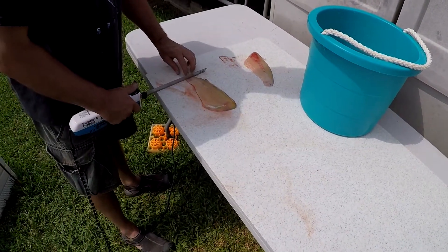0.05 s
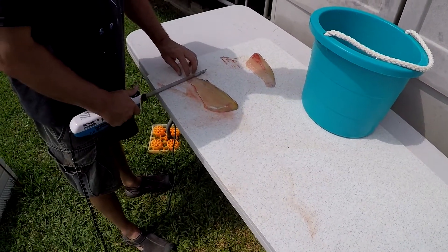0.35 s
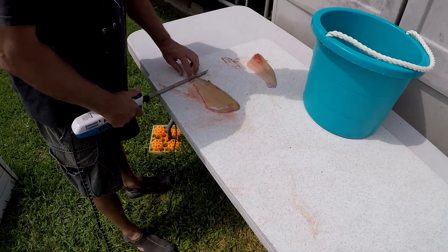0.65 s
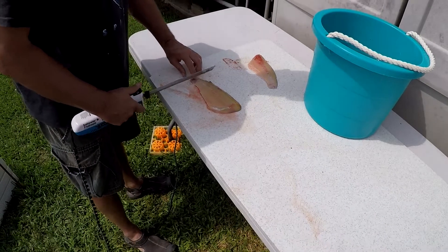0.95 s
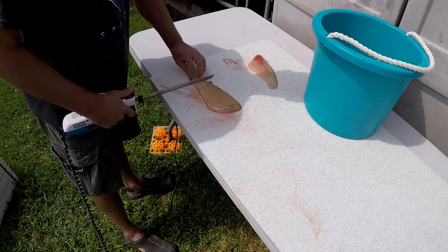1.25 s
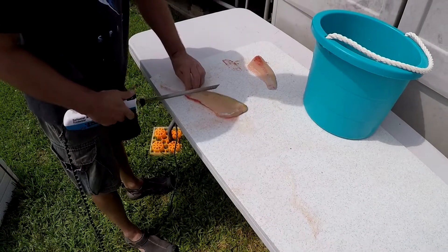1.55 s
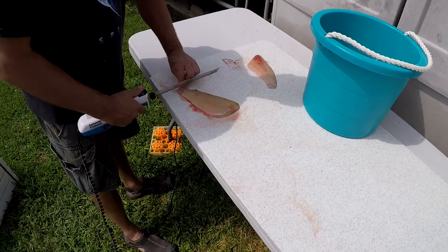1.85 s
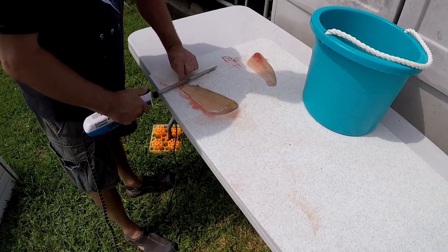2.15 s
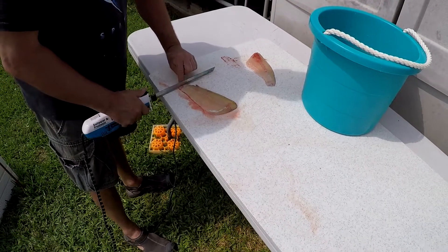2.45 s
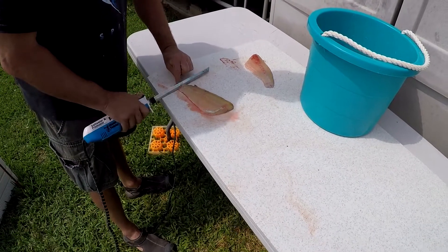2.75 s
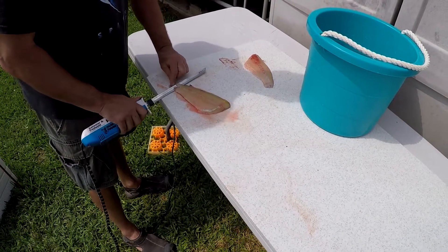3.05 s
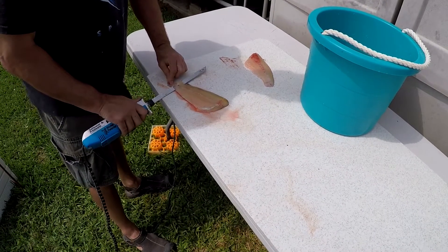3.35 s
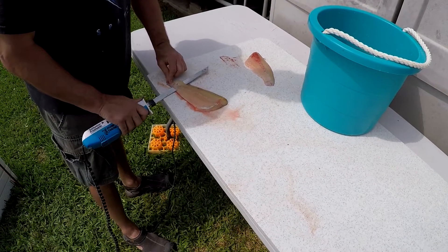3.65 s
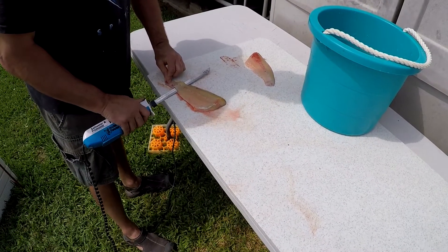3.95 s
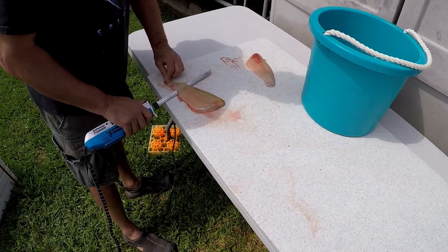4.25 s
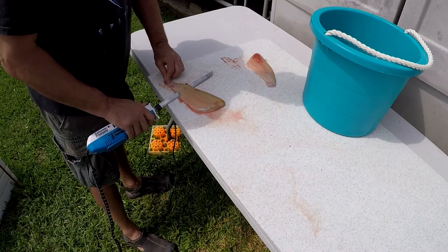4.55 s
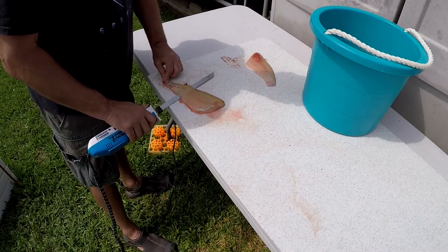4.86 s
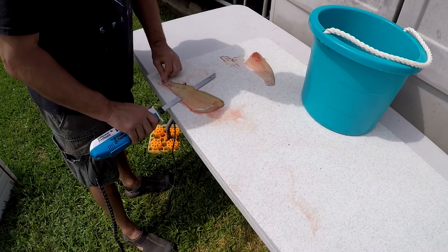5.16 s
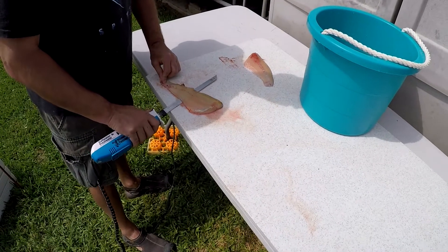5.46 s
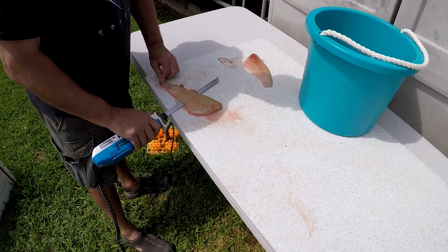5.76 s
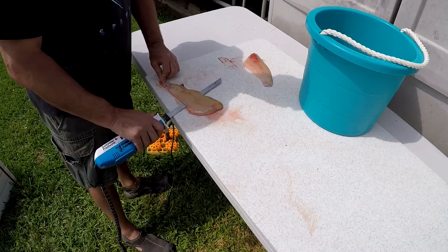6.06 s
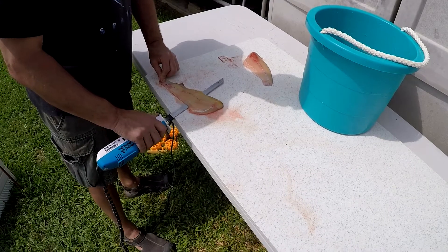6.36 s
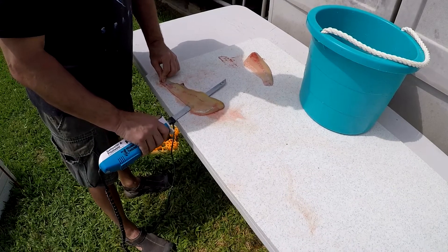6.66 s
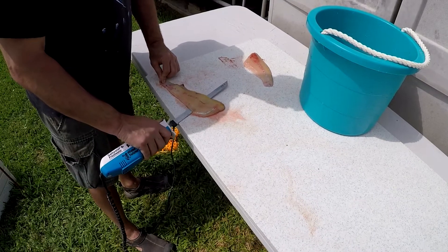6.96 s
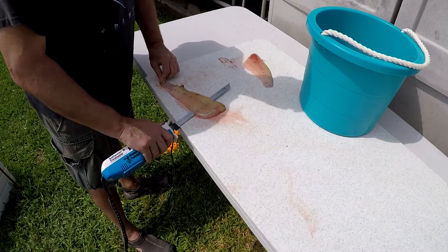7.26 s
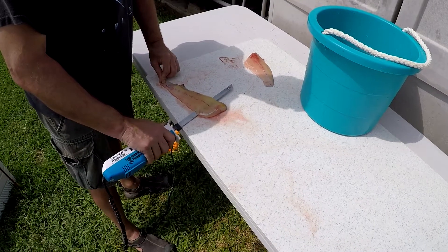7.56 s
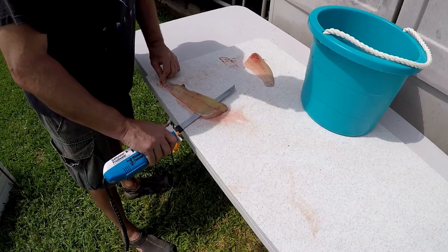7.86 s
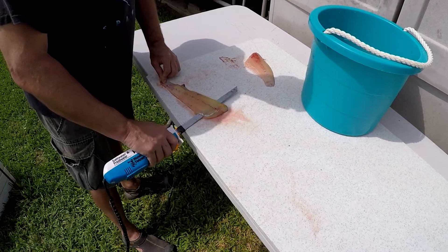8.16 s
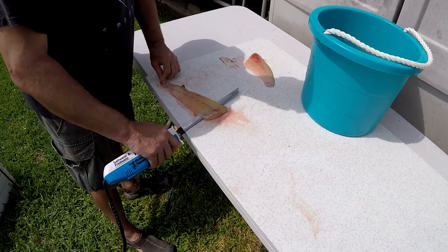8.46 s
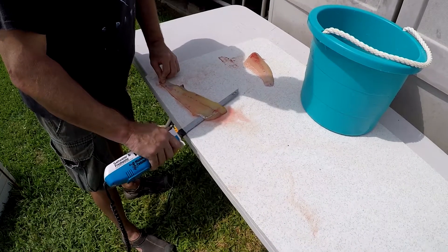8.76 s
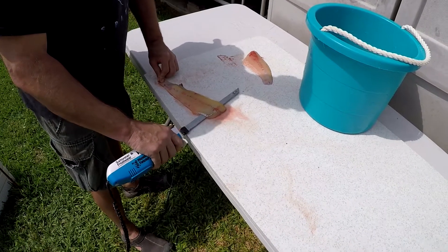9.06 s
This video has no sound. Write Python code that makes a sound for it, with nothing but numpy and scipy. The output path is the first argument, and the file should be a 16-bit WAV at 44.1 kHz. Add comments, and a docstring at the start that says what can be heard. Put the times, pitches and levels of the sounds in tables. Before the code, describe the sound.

An electric knife spins up for half a second, then winds down, its loose blades clacking. Faint birds chirp over a low garden hush in the pause. The knife starts again and cuts through a fish fillet with a continuous high motor whine, fast blade rattle and hiss, sagging slightly in pitch. In the second half, gusts of wind buffet the microphone with a heavy rumble.

```python
"""A corded electric knife skins a fish fillet on a garden table: a short burst, a coast-down, a long cut.
One shaft drives its sound: the mains motor whines in the plastic housing, the gear sings, the handle
growls, and the twin blades knock and rub at every stroke, slowing as the flesh drags on them.
Behind it lies a steady garden hush, with faint birds at the start and in the pause.
Later the breeze freshens and gusts buffet the microphone."""
import sys
import numpy as np
from scipy import signal
from scipy.fft import rfft, irfft
from scipy.io import wavfile
from scipy.ndimage import uniform_filter1d

SR = 44100
rng = np.random.default_rng(int(sys.argv[2]) if len(sys.argv) > 2 else 0)


def unload_wav(signal):
    """Save mono or channel-first audio to the path in sys.argv[1] as 16-bit WAV at rate SR, clipped to [-1, 1]."""
    wavfile.write(
        sys.argv[1],
        SR,
        np.round(np.clip(np.atleast_2d(signal).T, -1, 1) * 32767).astype(np.int16),
    )


N = 405719
T = np.arange(N) / SR


def undb(db):
    """Decibels to gain."""
    return 10 ** (np.asarray(db) / 20)


def along(position, points):
    """Read a two-column curve at a moving time or pitch."""
    return np.interp(position, *np.transpose(points))


def unit(x):
    """Scale to rms 1."""
    return x / np.std(x)


def even(x, span_s):
    """Ride the gain to hold the rms near 1 over a sliding span."""
    size = int(.7 * span_s * SR)
    power = uniform_filter1d(uniform_filter1d(x * x, size), size)
    return x / np.sqrt(np.abs(power) + 1e-4 * np.var(x))


def noise():
    """White noise."""
    return rng.standard_normal(N)


def drift(rate_hz):
    """Smooth random modulation with a spread of 1."""
    hold = int(SR / rate_hz)
    steps = np.repeat(rng.standard_normal(N // hold + 1), hold)
    return unit(uniform_filter1d(steps, hold)[:N])


def swell(middle_s, length_s, steepness=2.23):
    """Bell-shaped power envelope that rises and falls alike."""
    return np.exp(-np.abs(2 * (T - middle_s) / length_s) ** steepness)


def colour(x, eq, size=4096):
    """Ring x through a minimum-phase EQ curve of (freq_hz, gain_db) points."""
    hz, db = np.transpose(eq)
    bins_hz = np.maximum(np.arange(size // 2 + 1) * SR / size, 1)
    gain = undb(np.interp(np.log(bins_hz), np.log(hz), db))
    cepstrum = irfft(np.log(gain))
    cepstrum[1:size // 2] *= 2
    cepstrum[size // 2 + 1:] = 0
    return signal.fftconvolve(x, irfft(np.exp(rfft(cepstrum))))[:N]


# tone of the outdoor bed: freq_hz, gain_db
GARDEN_EQ = [(30, 6), (150, -1), (250, -9.5), (400, -15.5), (570, -32.5), (780, -20.5), (1050, -28.5),
             (1300, -27), (2200, -27), (4000, -34.5), (7500, -29), (10000, -31), (15000, -47)]
def garden(level_db):
    """A steady, bass-heavy outdoor hush that breathes slightly."""
    return undb(level_db + drift(3)) * unit(colour(noise(), GARDEN_EQ))


# distant bird calls: start_s, length_s, start_hz, end_hz, level_db
WHISTLES = [(0.0, 0.1, 3050, 3020, -72), (0.102, 0.11, 4020, 3900, -70), (0.185, 0.093, 5250, 5250, -74),
            (0.252, 0.064, 2780, 3570, -69), (1.662, 0.083, 6160, 6230, -62),
            (1.7, 0.17, 7380, 7600, -64.5), (1.752, 0.043, 5000, 4100, -70), (2.04, 0.12, 6170, 6170, -70),
            (2.058, 0.09, 5870, 5400, -71), (2.187, 0.13, 3800, 3700, -72), (2.2, 0.11, 7000, 7000, -74),
            (2.255, 0.086, 4500, 3930, -67), (2.36, 0.044, 5600, 5650, -65)]
def birds():
    """Thin, wavering whistles from far off."""
    waver = 1 + .007 * drift(200)
    flicker = undb(3 * drift(70) - 1.5)
    out = np.zeros(N)
    for start_s, length_s, start_hz, end_hz, level_db in WHISTLES:
        span = np.flatnonzero((T >= start_s) & (T < start_s + length_s))
        progress = np.linspace(0, 1, len(span))
        pitch_hz = (start_hz + (end_hz - start_hz) * progress) * waver[span]
        envelope = 3 * np.sin(np.pi * progress) * np.exp(-progress)
        out[span] += undb(level_db) * envelope * np.sin(2 * np.pi * np.cumsum(pitch_hz) / SR)
    return out * flicker


# the breeze freshening: time_s, rumble_db
BREEZE = [(0, -53), (2.5, -49.5), (3, -48.5), (4.5, -46.5), (4.8, -41.5), (5.3, -39.5), (6.9, -35.5),
          (7.5, -28.5), (8.4, -32), (9.2, -30)]
# gusts hitting the microphone: middle_s, length_s, rumble_db, flutter_db
GUSTS = [(1.25, .16, -46, -67), (3.3, 0.14, -43, -60), (3.627, .1, -42.5, -65), (5.11, .07, -37, -46),
         (5.35, 0.14, -34, -60), (5.59, 0.14, -29.5, -40), (5.89, 0.14, -29.5, -31),
         (6.007, 0.048, -26.5, -30.5), (6.131, 0.098, -24, -29), (6.303, 0.1, -21, -18),
         (6.454, .14, -25, -22), (6.631, 0.096, -25, -31), (6.75, 0.11, -29, -44),
         (7.024, 0.097, -23, -31.5), (7.11, 0.077, -22, -26.5), (7.28, 0.045, -20.5, -24),
         (7.387, 0.068, -19.5, -31), (7.459, 0.038, -21.5, -25), (7.6, 0.23, -22.5, -25),
         (7.88, .19, -22.5, -26), (8.045, 0.034, -18, -24.5), (8.142, 0.13, -21.5, -24),
         (8.41, 0.2, -21.5, -27), (8.64, 0.28, -24.5, -22), (8.931, 0.043, -26, -19.5),
         (9.044, 0.23, -24.5, -23.5)]
def wind_gains():
    """Faders for rumble and flutter: gusts add their power to the breeze."""
    breeze_db = along(T, BREEZE)
    rumble_power = undb(breeze_db) ** 2
    flutter_power = undb(-58 + .19 * (breeze_db + 53)) ** 2  # grows only a little with the breeze
    for middle_s, length_s, rumble_db, flutter_db in GUSTS:
        gust = swell(middle_s, length_s)
        rumble_power += undb(rumble_db) ** 2 * gust
        flutter_power += undb(flutter_db) ** 2 * gust
    return np.sqrt(rumble_power), np.sqrt(flutter_power)


# tone of the large and of the small eddies: freq_hz, gain_db
RUMBLE_EQ = [(10, 0.5), (22, 3), (40, 4.5), (75, 2.5), (110, -8), (160, -22), (300, -64.5), (2000, -100)]
FLUTTER_EQ = [(60, -17.5), (110, 7.5), (160, 2), (220, -6), (280, -13.5), (380, -28), (550, -42),
              (1200, -59), (4000, -100)]
def wind():
    """Large eddies rumble; small ones flutter, and reach higher as the gust grows."""
    rumble_gain, flutter_gain = wind_gains()
    rumble = even(colour(noise(), RUMBLE_EQ), .15)
    eddies = colour(noise() * undb(4.5 * drift(45)), FLUTTER_EQ)
    smallest = signal.sosfilt(signal.butter(2, 280, "high", fs=SR, output="sos"), eddies)
    force = np.clip(flutter_gain * undb(26), 0, 2)
    flutter = even(eddies, .094) + .31 * force * even(smallest, .053)
    return rumble_gain * rumble + flutter_gain * flutter


# trigger held down: on_s, off_s
TRIGGER = [(0.303, 0.825), (2.374, 9.3)]
# stroke rate the motor heads for, lower as the flesh drags: time_s, stroke_hz
PACE = [(0.5, 42.0), (0.82, 41.3), (2.7, 42.4), (3.15, 43.4), (3.5, 42.5), (3.88, 41.7), (4.1, 40.42),
        (4.4, 39.7), (4.9, 39.16), (6.2, 38.98), (7.0, 38.42), (7.3, 37.6), (7.55, 35.7), (7.7, 35.2),
        (7.86, 33.96), (8.05, 35.45), (8.5, 36.33), (9.2, 36.9)]
def motor_speed(half_pace_s=.115, coast_hz_per_s=21.2):
    """Strokes per second: a quick rise that flattens; once released, friction slows the shaft evenly."""
    stroke_hz = np.full(N, .5)
    for on_s, off_s in TRIGGER:
        held_s = np.clip(T, on_s, off_s) - on_s
        driven_hz = along(on_s + held_s, PACE) * held_s / (held_s + half_pace_s)
        lost_hz = coast_hz_per_s * np.maximum(T - off_s, 0)
        stroke_hz = np.maximum(stroke_hz, driven_hz - lost_hz)
    return stroke_hz


def mains_throb(powered, mains_hz=60):
    """The current crests twice in each mains cycle."""
    return powered * np.sin(2 * np.pi * 2 * mains_hz * T)


# how hard the blades press into the flesh and knock: time_s, bite_db
BITE = [(0.3, -5), (0.6, -2), (1.4, -3.5), (2.5, -6), (3.3, -3.5), (4.1, -4), (5.3, -1.5), (6.5, 0),
        (7.6, 0.5), (9.2, 0.5)]
IN_FILLET = T > 2.4
def part_gain(dynamics, stroke_hz, powered, cutting_hz=37.5, surge_peak_s=.044):
    """Fader for a knife part: it follows speed and bite, drops when coasting, surges at switch-on."""
    cutting_db, per_doubling_db, db_per_bite_db, coast_db, surge_db = dynamics
    speed_db = per_doubling_db * np.log2(stroke_hz / cutting_hz)
    running_db = cutting_db + speed_db + db_per_bite_db * along(T, BITE) + coast_db * (1 - powered)
    ages = [np.maximum(T - on_s, 0) / surge_peak_s for on_s, _ in TRIGGER]
    surge = sum(age * np.exp(1 - age) for age in ages)
    return np.hypot(undb(running_db), undb(surge_db) * surge)


def stroke_harmonics(turns, partials, wobble_db, wobble_hz):
    """Sines locked to the stroke, each wobbling in level on its own."""
    out = np.zeros(N)
    for harmonic, level_db in partials:
        gain = undb(level_db + wobble_db * drift(wobble_hz))
        out += gain * np.sin(2 * np.pi * (harmonic * turns + rng.random()))
    return out


# hum of the shaking handle: stroke_harmonic, relative_db
SHAKE_PARTIALS = [(2, -1), (3, 0.5), (4, 2.5), (5, 1.5), (6, 0.5), (7, -6), (8, 0.5), (9, -6.5), (10, -2.5),
                  (11, -8.5)]
# tone of the growl under it: freq_hz, gain_db
GROWL_EQ = [(80, -15), (160, 1), (230, -2), (300, 1.5), (390, -3), (460, -15), (600, -23), (3000, -109)]
# dynamics of both: cutting_db, per_doubling_db, db_per_bite_db, coast_db, surge_db
SHAKE_DYNAMICS = (-53.5, 6, -0.95, -8, -75)
def handle(turns, stroke_hz, powered):
    """The swinging blades shake the handle into a hum over a dull growl; harmonic 4 rings out once."""
    hum = unit(stroke_harmonics(turns, SHAKE_PARTIALS, wobble_db=2, wobble_hz=5.1))
    growl = undb(-6.5) * unit(colour(noise(), GROWL_EQ))
    ring = np.sqrt(2 * swell(middle_s=3.98, length_s=.26)) * np.sin(2 * np.pi * 4 * turns)
    return part_gain(SHAKE_DYNAMICS, stroke_hz, powered) * (hum + growl) + undb(-48) * ring


# buzz of the housing at full bite: stroke_harmonic, level_db
BUZZ_PARTIALS = [(10, -66), (19, -70), (21, -65.5), (23, -69.5), (25, -66.5)]
def housing_buzz(turns, db_per_bite_db=2.2):
    """Clean harmonics of the stroke that grow as the blades press into the fillet."""
    buzz = np.sqrt(2) * stroke_harmonics(turns, BUZZ_PARTIALS, wobble_db=1.3, wobble_hz=5)
    return buzz * undb(db_per_bite_db * along(T, BITE)) * IN_FILLET


def blows(turns, place, scatter_db):
    """One impulse of random strength each time the crank passes a place (0 to 1) in its turn."""
    count = np.floor(turns - place)
    at = np.flatnonzero(np.diff(count) > 0)
    late = (count[at + 1] + place - turns[at]) / (turns[at + 1] - turns[at])  # share of a sample
    strength = undb(scatter_db * rng.uniform(-1, 1, len(at)))
    out = np.zeros(N)
    out[at], out[at + 1] = strength * (1 - late), strength * late
    return out


def chatter(hits, decay_s, loose, size=1024):
    """Each blow sets off a brief chatter: partly the same every time, partly loose noise."""
    fade = np.exp(-np.arange(size) / SR / decay_s)
    spectrum = rfft(fade * rng.standard_normal(size))
    # flattened, so it smears a blow in time without colouring it
    spectrum /= np.sqrt(uniform_filter1d(np.abs(spectrum) ** 2, size // 128))
    same = signal.fftconvolve(hits, irfft(spectrum))[:N]
    free = signal.fftconvolve(hits, fade)[:N] * noise()
    return unit(same) + loose * unit(free)


# tone of the blades' rattle, the teeth's hiss and the hollow handle's boom: freq_hz, gain_db
RATTLE_EQ = [(500, -25), (1090, -14), (1250, -3.5), (1500, 0), (1750, -1.5), (1980, -0.5), (2300, -2),
             (2600, -11.5), (3200, -13), (3800, -3), (4400, -13.5), (7000, -15.5), (9500, -43.5),
             (15000, -37.5)]
HISS_EQ = [(1000, -31.5), (2700, 0.5), (3300, 3.5), (3850, 8), (4300, 0.5), (5000, -1.5), (6200, 3),
           (6700, 1), (7400, 2), (8600, -2), (9500, -12.5), (11300, -14.5), (12050, -10.5), (12800, -15),
           (13500, -17), (15300, -19.5)]
BOOM_EQ = [(200, -20), (400, -11), (570, -13.5), (660, -6.5), (730, 5.5), (810, 3), (870, -3.5), (950, -5),
           (1050, -18.5), (1500, -5), (6000, -75.5)]
# their dynamics: cutting_db, per_doubling_db, db_per_bite_db, coast_db, surge_db
RATTLE_DYNAMICS = (-45.5, 13, 0.76, -3, -58.5)
HISS_DYNAMICS = (-51.5, 8, 0.5, -2.5, -62)
BOOM_DYNAMICS = (-53, 6.5, 1.18, -0.5, -61.5)
def blades(turns, stroke_hz, powered):
    """The blades knock at one end of the stroke, clatter twice on the way back, and rub throughout."""
    hard = chatter(blows(turns, place=.72, scatter_db=4.5), decay_s=.003, loose=.65)
    soft = chatter(blows(turns, place=.27, scatter_db=3.5), decay_s=.009, loose=.45)
    slap = chatter(blows(turns, place=.08, scatter_db=3.5), decay_s=.012, loose=.6)
    knocks = unit(hard + .9 * soft + .7 * slap) * undb(along(T, BITE))
    rattle = even(colour(knocks + .5 * noise(), RATTLE_EQ), .14)
    rattle *= undb((1 - powered) * np.interp(stroke_hz, [5.4, 8.6], [-10, 0]))  # slackens near rest
    # the brushes spark a little harder at each crest of the current
    rub = noise() * (1 + .059 * mains_throb(powered)) * undb(.75 * drift(70))
    hiss = even(colour(rub + undb(-8) * knocks, HISS_EQ), .19)
    hiss *= undb(2.57 * IN_FILLET)  # the teeth hiss more in the flesh
    boom = even(colour(knocks + 1.2 * noise(), BOOM_EQ), .14)
    return (part_gain(RATTLE_DYNAMICS, stroke_hz, powered) * rattle
            + part_gain(HISS_DYNAMICS, stroke_hz, powered) * hiss
            + part_gain(BOOM_DYNAMICS, stroke_hz, powered) * boom)


def loose_blades(turns, stroke_hz, powered, start_s=.52, end_s=1.9):
    """Outside the fillet the blades hang loose and clack once a stroke, slowing with the shaft."""
    burst = chatter(blows(turns, place=.72, scatter_db=5.5), decay_s=.0025, loose=1)
    ring = unit(colour(burst, RATTLE_EQ) + undb(-6) * colour(burst, HISS_EQ))
    gain = undb(-9.5) * part_gain(RATTLE_DYNAMICS, stroke_hz, powered)
    return gain * ring * ((T > start_s) & (T < end_s))


# one-off hits of the blades and the switch: start_s, level_db
CLACKS = [(0.3033, -43), (0.3282, -41), (0.5338, -34), (0.5507, -35), (0.5981, -32), (0.6166, -34),
          (0.6495, -32), (0.7862, -31), (0.8865, -29), (0.9309, -35), (0.9987, -37), (1.1708, -42),
          (1.3873, -41), (2.3761, -44)]
def clacks(decay_s, gain_db, size=1024):
    """The switch clicks and the blades strike their sockets: short noise bursts that ring the knife."""
    hits = np.zeros(N)
    for start_s, level_db in CLACKS:
        hits[int(start_s * SR)] = undb(level_db + gain_db)
    fade = np.exp(-np.arange(size) / SR / decay_s)
    burst = signal.fftconvolve(hits, fade)[:N] * noise()
    return (colour(burst, RATTLE_EQ) + undb(-16) * colour(burst, HISS_EQ)
            + undb(-7) * colour(burst, BOOM_EQ))


def jolts(decay_s, boom_db, click_db):
    """At switch-on the armature kicks against the housing: a boom and a shorter click."""
    kick = sum((T > on_s) * np.exp(-np.abs(T - on_s) / decay_s) for on_s, _ in TRIGGER)
    boom = undb(boom_db) * unit(colour(noise(), BOOM_EQ))
    click = undb(click_db) * unit(colour(noise(), HISS_EQ))
    return boom * kick + click * kick ** 2


# the gear tone swelling through housing resonances: pitch_hz, level_db
GEAR_LEVELS = [(1800, -72), (2150, -63), (2500, -64.5), (2800, -81), (2995, -78), (3045, -58),
               (3085, -57.5), (3110, -63)]
def gear(angle, stroke_hz, powered, harmonic=80):
    """Meshing teeth sing; coasting, the loose gear is louder, wanders and falls silent at low speed."""
    level_db = along(harmonic * stroke_hz, GEAR_LEVELS) + 3 * (1 - powered) + 2.5 * drift(40)
    wander = .9 * (1 - powered) * drift(400)
    fade = np.interp(stroke_hz, [14, 24], [0, 1])
    return np.sqrt(2) * undb(level_db) * fade * np.sin(harmonic * angle + wander)


WHINE_HARMONIC = 100  # armature whine cycles per stroke
# faint sheen of the drive: stroke_harmonic, level_db
OVERTONES = [(160, -64), (400, -80)]
def overtones(angle, shaft_hz, powered):
    """Thin high tones at speed; while the motor is slow, the whine's fourth harmonic squeals in fits."""
    sheen = sum(undb(level_db + 2.3 * drift(18)) * np.sin(harmonic * angle + .64 * drift(160))
                for harmonic, level_db in OVERTONES)
    at_speed = powered * (shaft_hz > 35)
    squeal_hz = 4 * WHINE_HARMONIC * shaft_hz
    squeal_db = np.interp(squeal_hz, [2900, 3800, 5200, 7000, 8800, 9600],
                          [-90, -70, -76, -62.5, -76, -110])
    squeal = np.sin(4 * WHINE_HARMONIC * angle + .65 * drift(250))
    squeal *= undb(squeal_db - 6 * powered + 5 * drift(35))
    return np.sqrt(2) * (at_speed * sheen + squeal)


# the whine's octave swelling through housing resonances: pitch_hz, level_db
OCTAVE_LEVELS = [(2400, -76.5), (3100, -69), (3500, -72), (3850, -59.5), (4300, -61), (4700, -84),
                 (5100, -66.5), (6000, -57.5), (6500, -63), (7200, -57.5), (7550, -60.5), (7750, -54)]
# its slow fades in and out: time_s, gain_db
OCTAVE_FADE = [(1.5, -1), (2.55, 0.5), (2.85, 6), (3.2, 0), (3.95, -3), (4.4, 5.5), (5.5, -5), (6.2, 4),
               (7.15, 1), (7.8, -6), (8.9, 3)]
def whine_octave(angle, stroke_hz, powered):
    """A flickering octave above the whine, hardened by the inrush current during spin-up."""
    level_db = along(2 * WHINE_HARMONIC * stroke_hz, OCTAVE_LEVELS) + along(T, OCTAVE_FADE)
    inrush_db = powered * np.interp(stroke_hz, [16, 22.8], [18.5, 0])
    flicker_db = (3.5 - .5 * powered) * drift(50) - 3.5
    tone = (1 + .25 * mains_throb(powered)) * np.sin(2 * WHINE_HARMONIC * angle + .26 * drift(150))
    return np.sqrt(2) * undb(level_db + inrush_db + flicker_db) * tone


# the whine swelling through housing resonances: pitch_hz, level_db
WHINE_LEVELS = [(900, -73), (1300, -58), (1900, -54), (2400, -58), (2820, -55), (2950, -46), (3080, -43.5),
                (3220, -42.5), (3300, -48), (3400, -51), (3580, -55), (3690, -51.5), (3750, -46.5),
                (3790, -50), (3860, -52)]
# housing modes that colour it: centre_hz, width_hz, gain_db
HOUSING_MODES = [(3224, 127, 27), (3713, 95, 23)]
def armature_whine(angle, stroke_hz, powered, coast_db=-22):
    """The armature's pull throbs with the mains and rings the housing; it ducks with the current off."""
    rocking = .075 * np.sin(angle)  # the load of each stroke rocks the armature
    pull = np.sin(WHINE_HARMONIC * angle + rocking + .29 * drift(300))
    pull *= (1 + .74 * mains_throb(powered)) * (1 + .24 * drift(220))
    housed = .12 * pull
    for centre_hz, width_hz, gain_db in HOUSING_MODES:
        mode = signal.iirpeak(centre_hz, centre_hz / width_hz, SR)
        housed += undb(gain_db) * signal.lfilter(*mode, pull)
    level_db = along(WHINE_HARMONIC * stroke_hz, WHINE_LEVELS) + coast_db * (1 - powered)
    return undb(level_db) * even(housed, .19)


def motor(turns, stroke_hz, powered):
    """All drive tones share one shaft; as it strains up to speed, the teeth judder in their play."""
    shaft_hz = np.gradient(turns) * SR  # stroke rate with its flutter
    strain = powered * np.interp(shaft_hz, [18, 28, 35], [1, .5, 0])
    angle = 2 * np.pi * turns + .0055 * strain * drift(350)
    stutter = undb(3.5 * strain * (drift(70) - .6))
    return stutter * (gear(angle, stroke_hz, powered) + overtones(angle, shaft_hz, powered)
                      + whine_octave(angle, stroke_hz, powered)
                      + armature_whine(angle, stroke_hz, powered))


def knife():
    """One slightly fluttering shaft drives the running parts, which die away as it comes to rest."""
    stroke_hz = motor_speed()
    turns = np.cumsum(stroke_hz * (1 + .0008 * drift(25))) / SR
    held = sum(1. * ((T > on_s) & (T < off_s)) for on_s, off_s in TRIGGER)
    powered = uniform_filter1d(held, SR // 500)
    moving = np.maximum(powered, np.interp(stroke_hz, [2.5, 7], [0, 1]))
    running = sum(part(turns, stroke_hz, powered) for part in (handle, blades, loose_blades, motor))
    hits = clacks(decay_s=.003, gain_db=3.5) + jolts(decay_s=.035, boom_db=-52.5, click_db=-61)
    return moving * (running + housing_buzz(turns)) + hits


def scene():
    """Garden, birds, wind and knife in one mono mix."""
    return (garden(level_db=-51) + birds() + wind() + knife())[None]


def record(dry, cutoff_hz=15250):
    """A steep low-pass takes off the very top."""
    return signal.sosfilt(signal.ellip(10, .2, 80, cutoff_hz, fs=SR, output="sos"), dry)


dry = scene()
out = record(dry)
unload_wav(out)
```